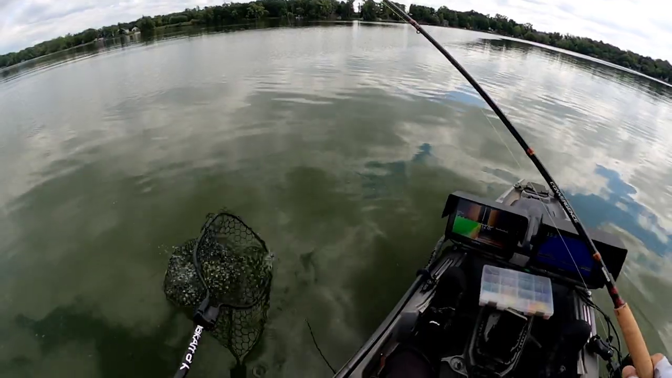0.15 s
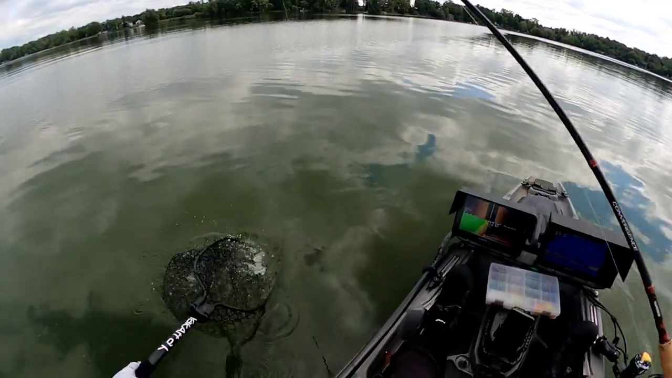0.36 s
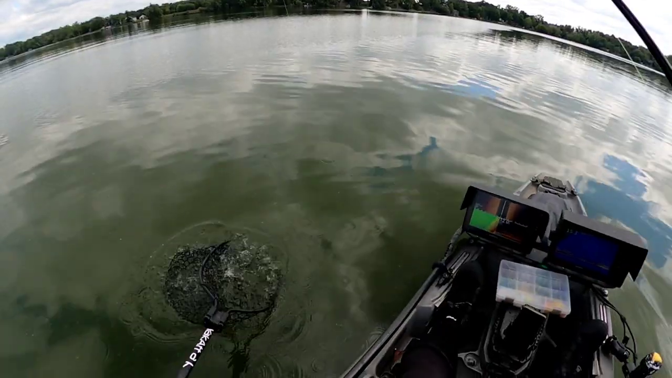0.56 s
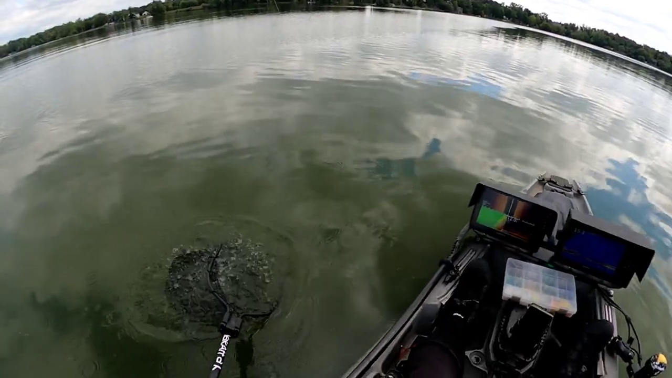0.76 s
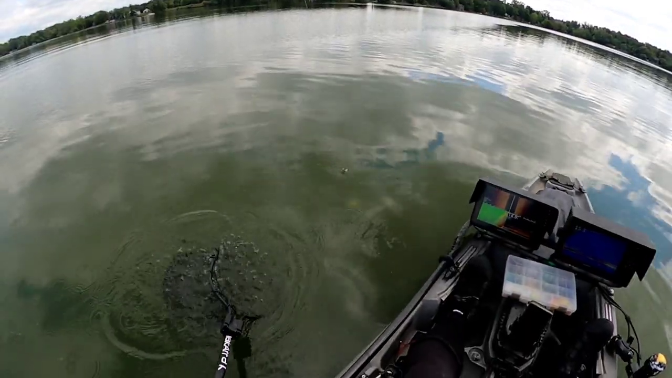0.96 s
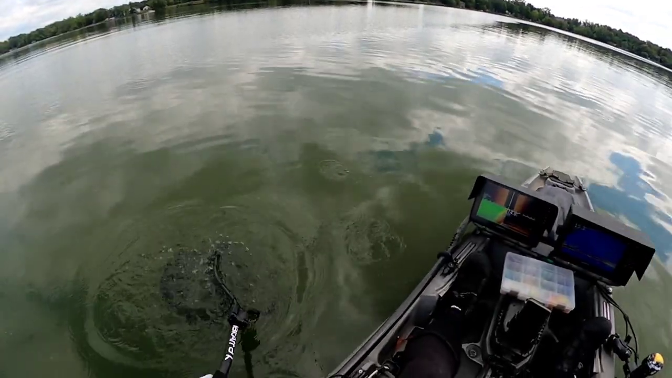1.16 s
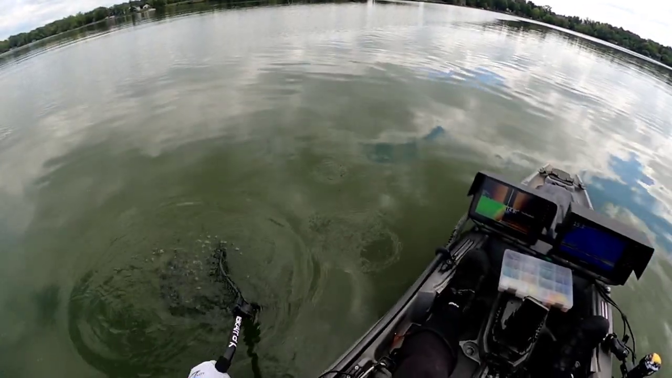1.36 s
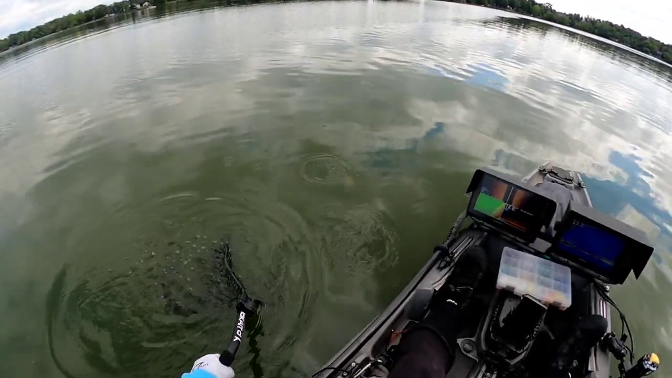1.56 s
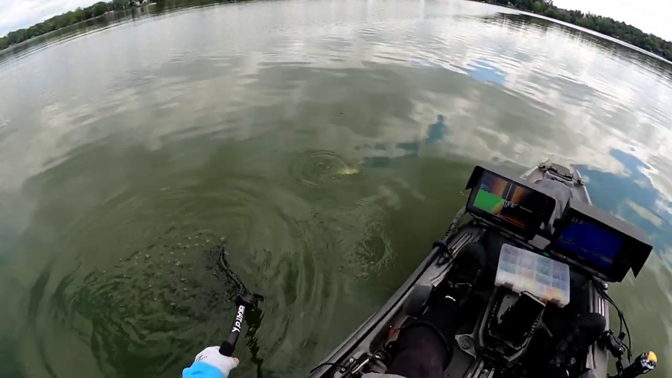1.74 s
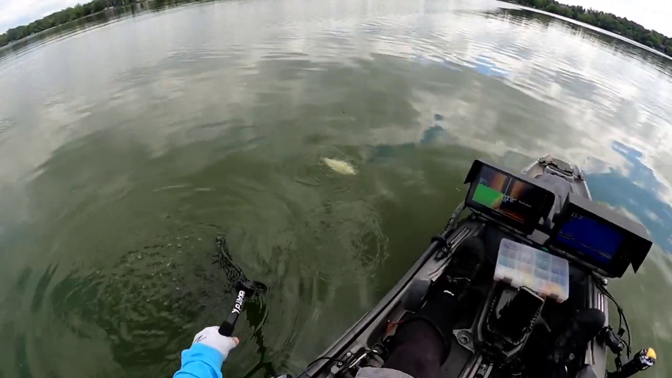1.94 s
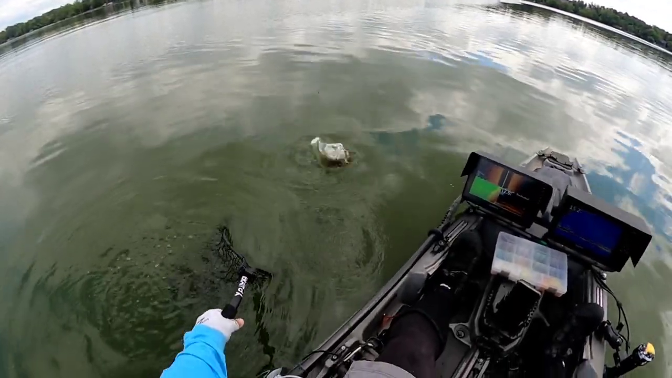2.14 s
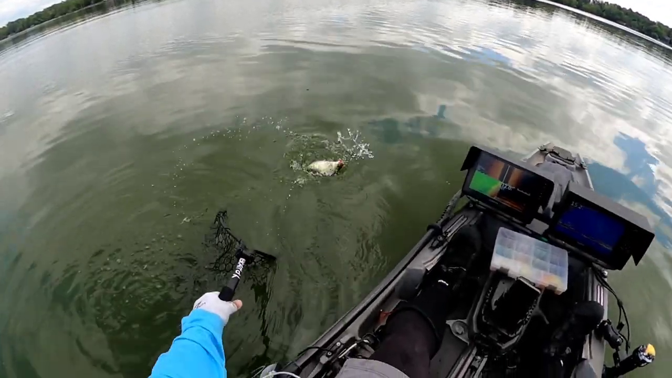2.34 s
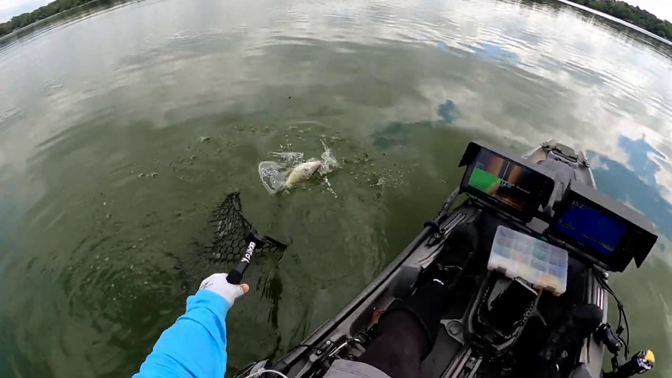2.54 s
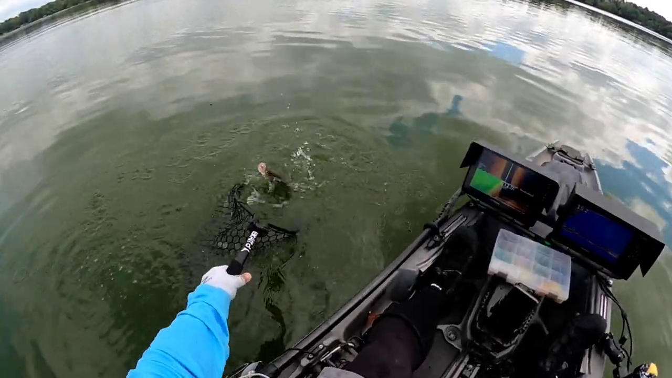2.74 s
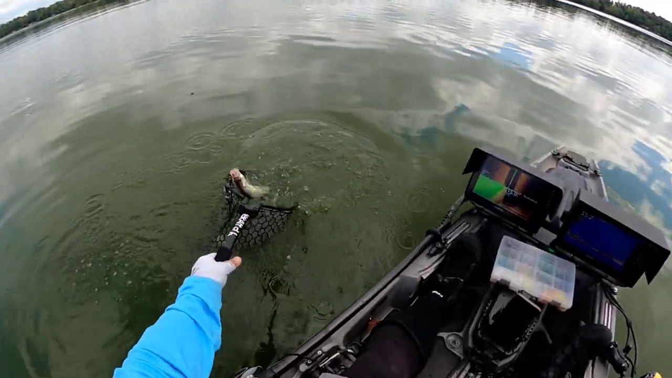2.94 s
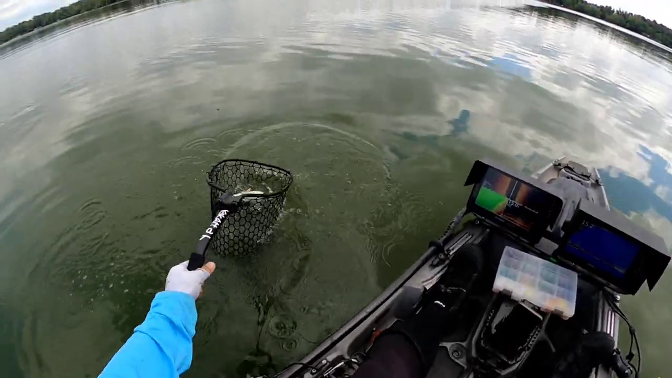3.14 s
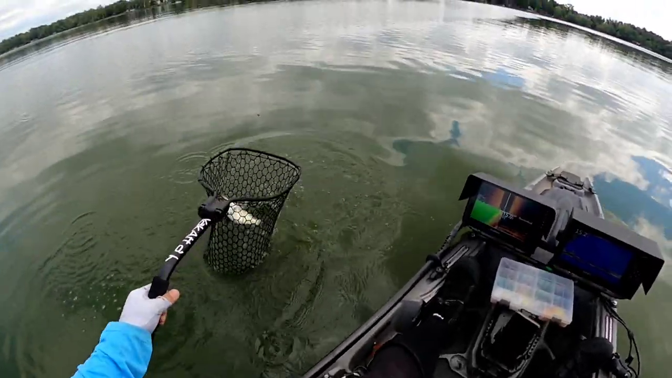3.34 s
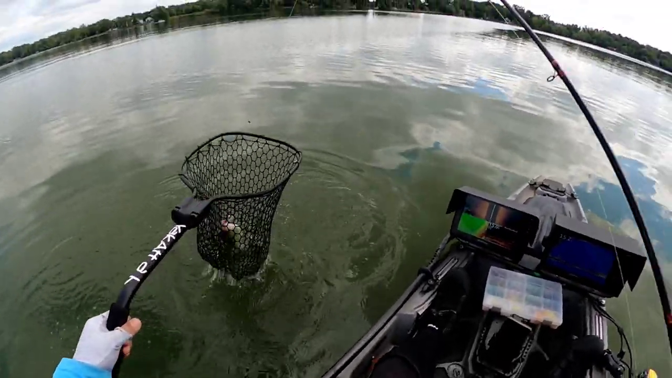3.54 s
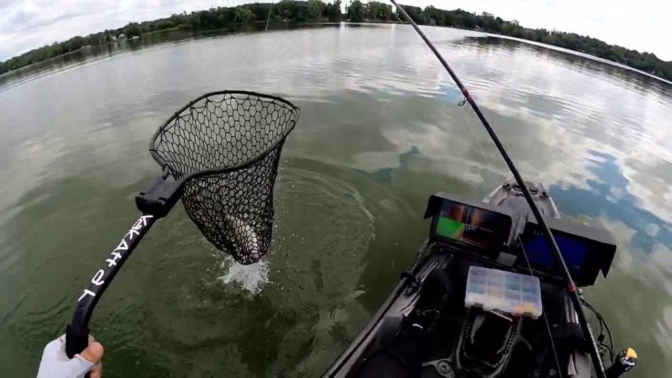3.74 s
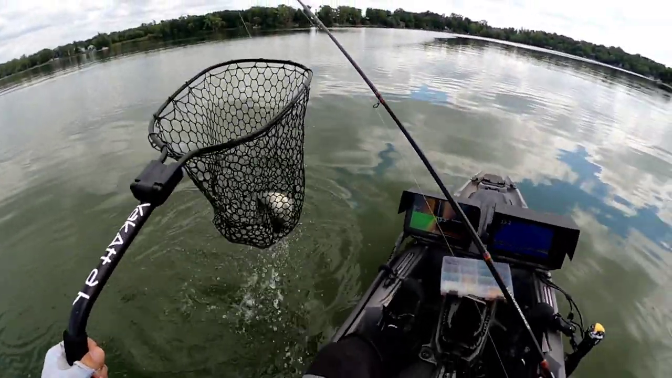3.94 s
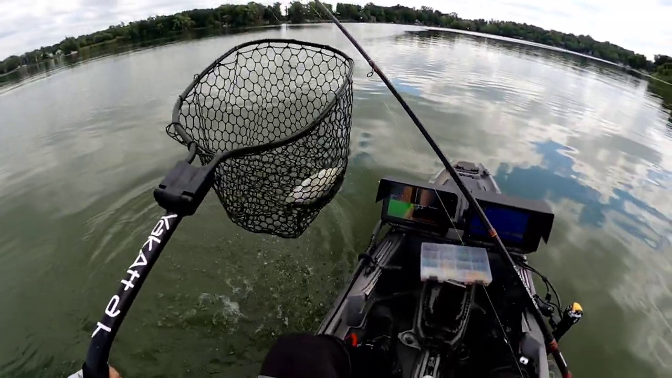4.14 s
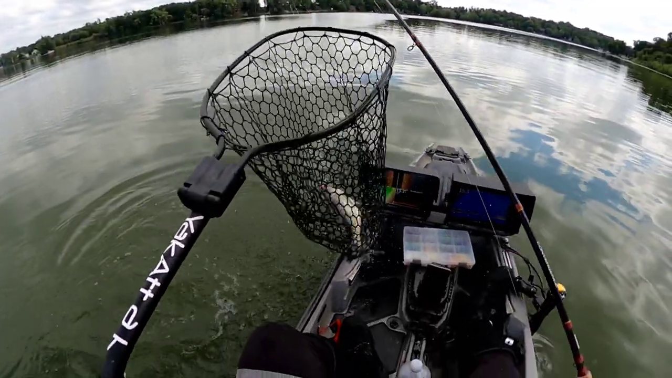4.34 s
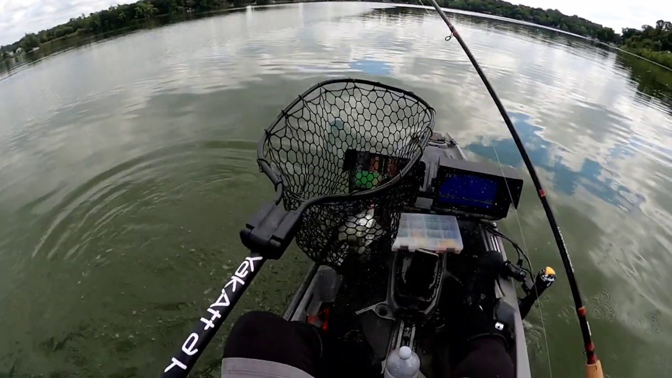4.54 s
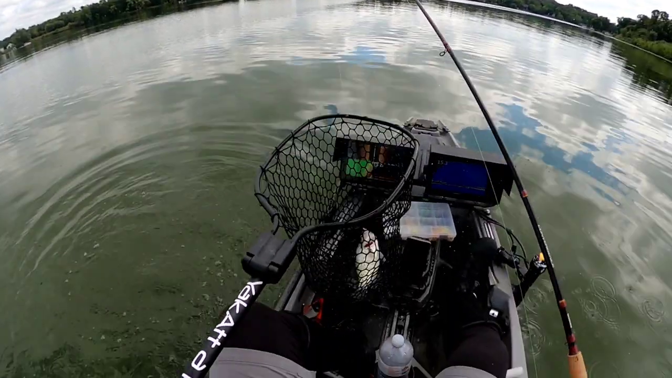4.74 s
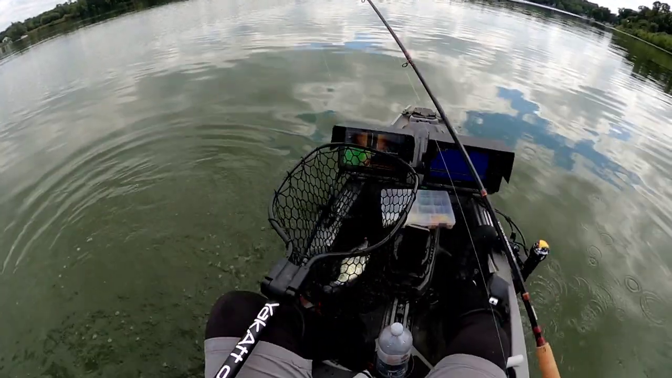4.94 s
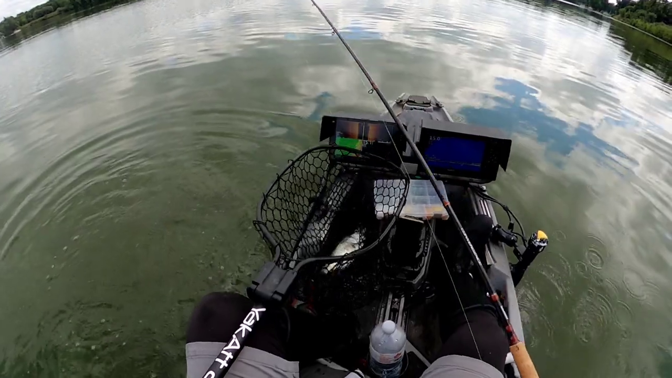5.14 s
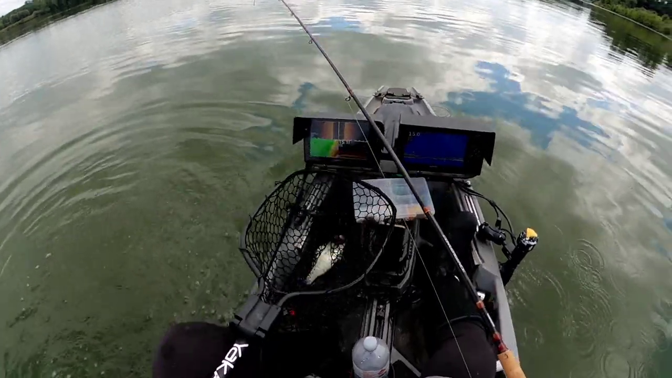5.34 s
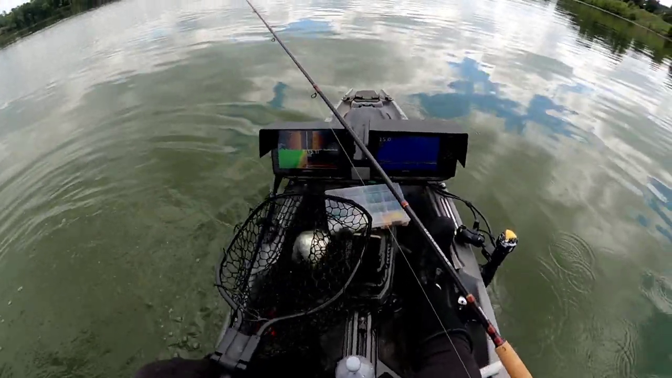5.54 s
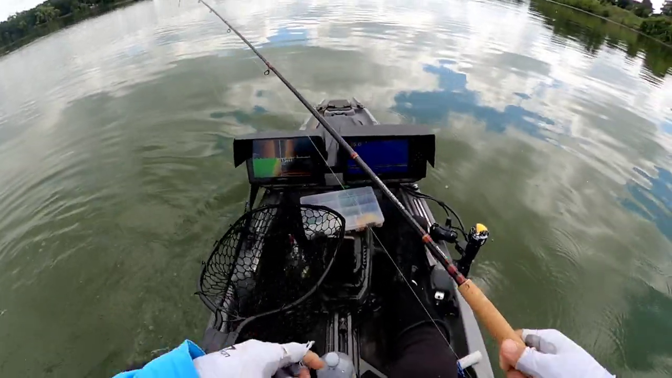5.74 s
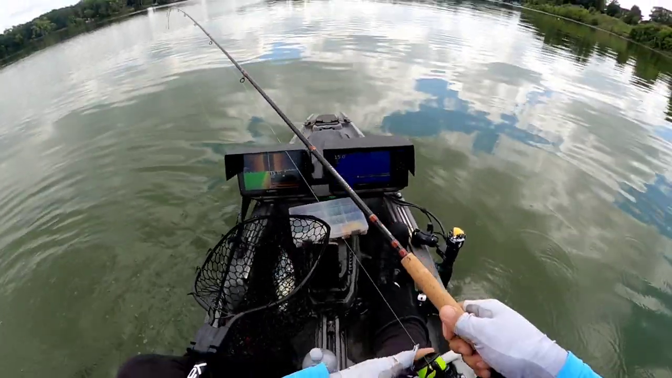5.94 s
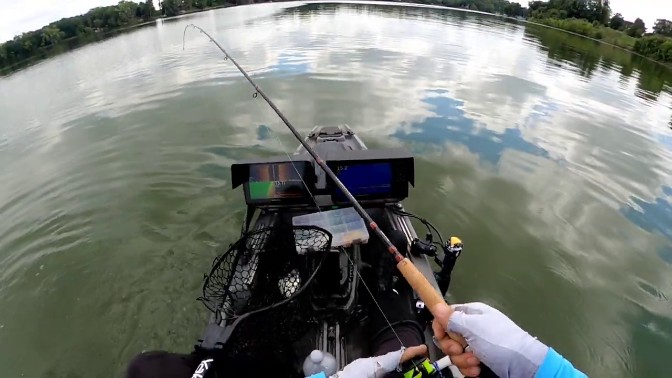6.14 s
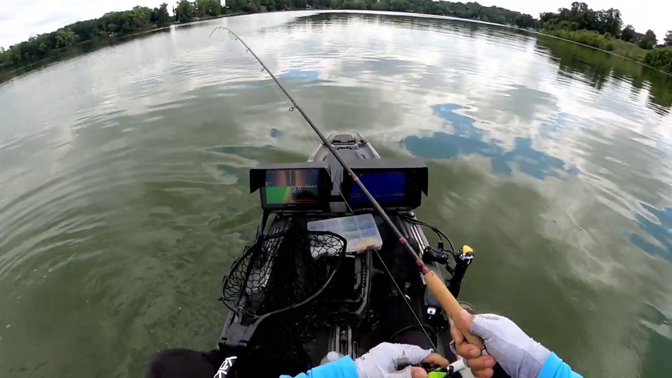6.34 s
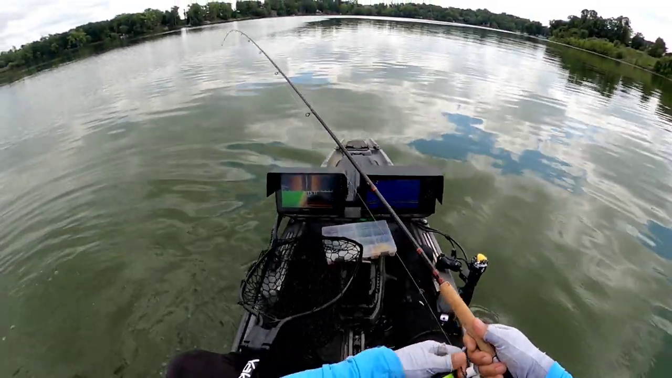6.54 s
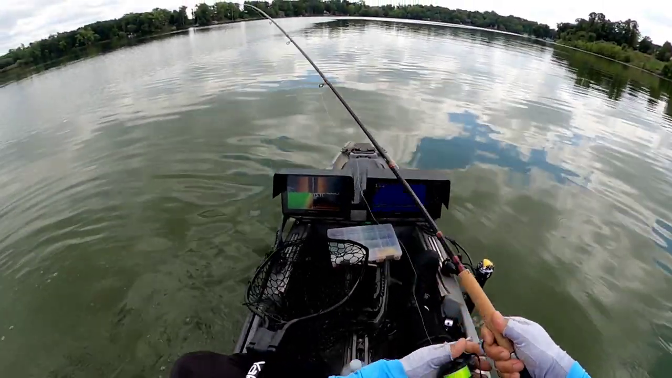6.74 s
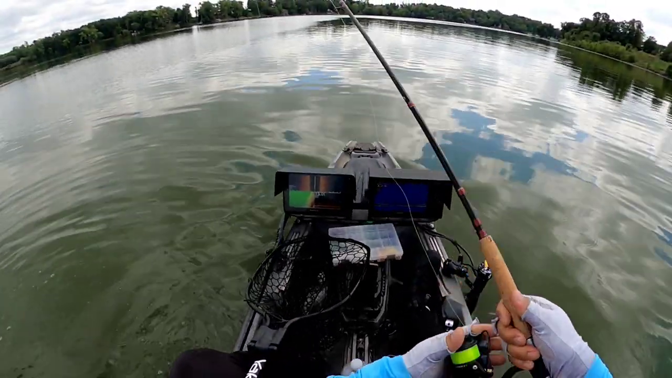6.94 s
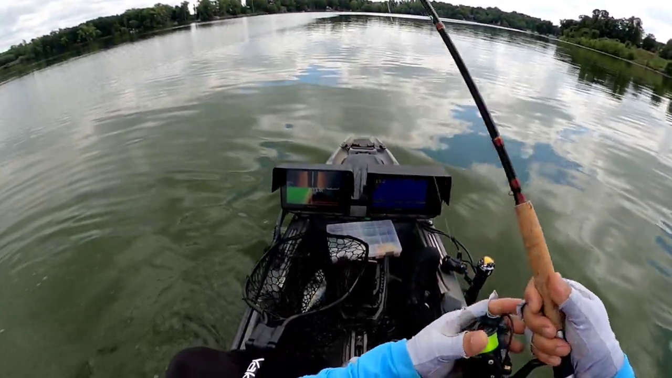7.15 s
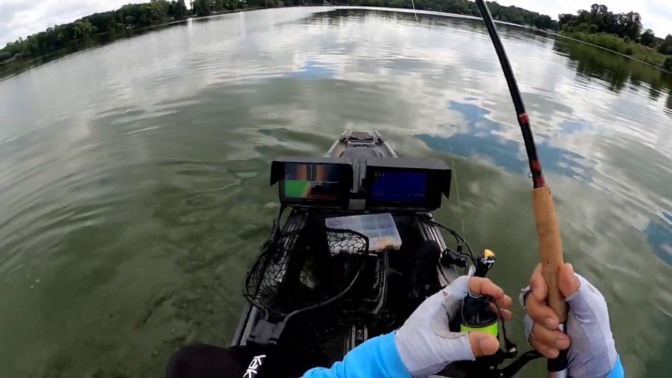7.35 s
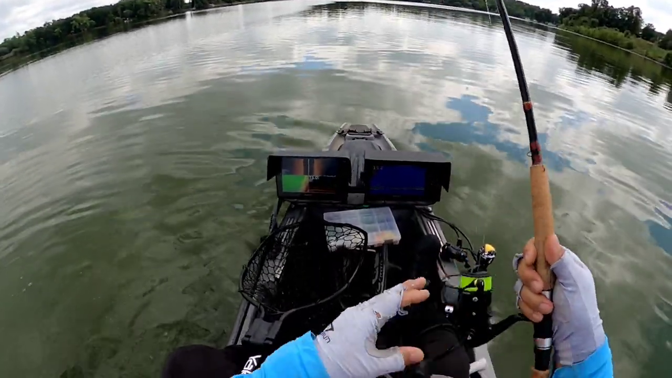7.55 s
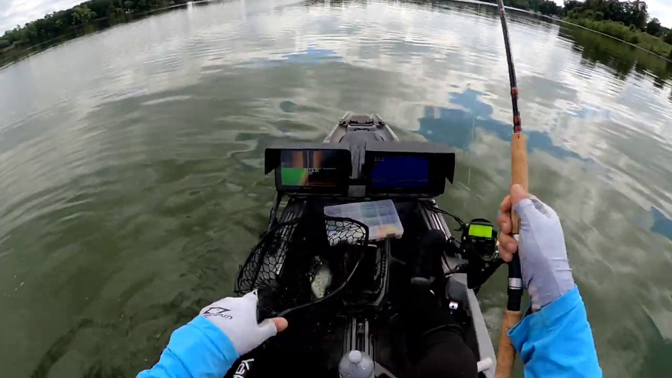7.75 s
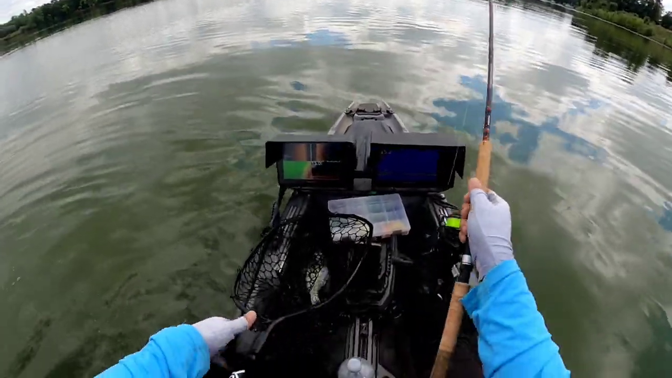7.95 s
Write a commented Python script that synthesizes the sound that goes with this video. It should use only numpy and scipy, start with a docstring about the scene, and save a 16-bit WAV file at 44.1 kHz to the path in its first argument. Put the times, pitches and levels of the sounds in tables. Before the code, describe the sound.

Close splashes and bubbly gulps, a streaming net rising from the lake, then hard frame clacks, dull hull thumps and small fishing reel clicks.

```python
"""Landing a fish from a kayak

A net dips into a calm lake; a hooked fish thrashes, is scooped up and lifted, streaming water (bubbles and sprayed noise).
The net's frame clacks on the deck and the fish flops on the hollow plastic hull (struck notes that die away).
A reel clicks and squeaks, and wet mesh drags (noise bursts and tiny grains).
All is close to a microphone in the open air, over a murmur of water (noise and bubbles), wind, a faint hum and a far bird."""
import sys
import numpy as np
from scipy import signal
from scipy.fft import rfft, irfft, next_fast_len
from scipy.io import wavfile
from scipy.ndimage import map_coordinates

SR = 44100
rng = np.random.default_rng(int(sys.argv[2]) if len(sys.argv) > 2 else 0)


def unload_audio(sound):
    """Save the sound as a 16-bit wav file, at the path given as the first command line argument."""
    columns = np.transpose(np.atleast_2d(sound))
    # keep every value between -1 and 1, then stretch to whole-number steps
    steps = np.round(np.clip(columns, -1, 1) * 32767)
    wavfile.write(sys.argv[1], SR, steps.astype(np.int16))


N = 356769  # length of the scene in samples
AGE = np.arange(SR // 3) / SR  # time since a blow, in seconds
CLOCK = np.arange(0, N, 32) / SR  # coarse scene time for slow swells, in seconds
SWELL_CYCLES = 1.2  # cycles in which a bubble's note swells

# Soft blows on the hull. Each row: start in seconds, level in dB, pitch in Hz,
# time for the struck panel to fall 60 dB in seconds.
HULL_BLOWS = [(3.507, -26.5, 219, 0.094), (4.454, -25, 142, 0.2), (4.547, -20, 112, 0.033),
              (4.573, -23.5, 128, 0.058), (4.624, -30, 215, 0.096), (4.777, -30, 256, 0.04),
              (4.956, -28.5, 402, 0.079), (5.036, -20, 59.7, 0.13), (5.062, -16.5, 526, 0.018),
              (5.07, -21, 129, 0.081), (5.135, -15.5, 111, 0.052), (5.156, -21.5, 155, 0.096),
              (5.519, -22, 115, 0.15), (5.578, -20, 182, 0.093), (5.583, -15.5, 360, 0.081),
              (5.611, -14.5, 540, 0.042), (5.626, -13.5, 380, 0.082), (5.661, -26, 78, 0.11),
              (5.841, -10.5, 145, 0.1), (5.852, -18.5, 297, 0.036), (5.887, -21, 115, 0.072),
              (5.916, -26, 153, 0.072), (6.303, -17, 124, 0.11), (6.332, -22.5, 93.5, 0.072),
              (6.632, -21, 105, 0.22), (6.665, -20, 92, 0.14), (6.826, -24, 209.5, 0.31),
              (6.898, -23, 251, 0.031), (6.965, -27.5, 64, 0.064), (7.433, -17.5, 267, 0.13),
              (7.451, -21, 355, 0.12), (7.507, -21, 176, 0.037), (7.53, -21.5, 221, 0.075),
              (7.671, -20.5, 101.3, 0.14)]
# The quiet air around the boat. Each row: time in seconds, then the levels of wind, ripples and hiss in dB.
CALM_AIR = [(0, -48.5, -53.5, -71.5), (.7, -54, -75.5, -69), (1.3, -52.5, -63, -72.5),
            (1.8, -52, -52.5, -79.5), (2.3, -52.5, -54, -71.5), (3.3, -58, -65, -67.5),
            (5.3, -51.5, -51, -67), (7.0, -58, -58.5, -65), (8.09, -51.5, -62, -76.5)]


def amp(db):
    """Decibels to gain."""
    return 10 ** (np.asarray(db) / 20)


def unit(x):
    """Scale to an average strength (rms) of 1."""
    return x / np.sqrt(np.mean(x ** 2) + 1e-20)


def peaked(x):
    """Scale to a peak of 1."""
    return x / (np.abs(x).max() + 1e-20)


def along(points, hz):
    """Read a curve of (Hz, value) points, with pitch on a log axis."""
    f, v = np.transpose(points)
    return np.interp(np.log(hz + 1), np.log(f + 1), v)


def curves(rows):
    """Gains per sample from rows of (seconds, dB, ..), silent outside their span."""
    s, *columns = np.transpose(rows)
    time = np.arange(N) / SR
    return [amp(np.interp(time, s, column, left=-120, right=-120)) for column in columns]


def wobble(rate, size=N):
    """A smooth random curve through so many random points a second."""
    knots = rng.standard_normal(int(size * rate / SR) + 4)
    return map_coordinates(knots, [np.arange(size) * rate / SR])


def filtered(x, response):
    """Multiply the spectrum of x by a response of frequency."""
    n = x.shape[-1]
    m = next_fast_len(n + SR // 8)
    return irfft(rfft(x, m) * response(np.fft.rfftfreq(m, 1 / SR)), m)[..., :n]


def colour(x, points):
    """Shape the tone of x with (Hz, dB) points, at rms 1."""
    return unit(filtered(x, lambda hz: amp(along(points, hz))))


def band(x, centre_hz, q):
    """Pass x through one broad resonance, at rms 1; a higher q is narrower."""
    return unit(filtered(x, lambda hz: 1 / (1 + (q * (hz / centre_hz - centre_hz / (hz + 1))) ** 2)))


def white(size=len(AGE)):
    """White noise, by default as long as one blow."""
    return rng.standard_normal(size)


def fade(t60, attack):
    """The envelope of a blow: a quick rise, then a decay of 60 dB in t60 seconds."""
    decay = np.exp(-np.log(1000) * AGE / max(t60, 1e-3))
    return decay * (1 - np.exp(-AGE / attack))


def add(track, s, sound):
    """Mix a sound into the track at time s."""
    part = track[max(round(s * SR), 0):][:len(sound)]
    part += sound[:len(part)]


def swell(s, hold, rise, fall):
    """Rise until time s, hold, then die; rise and fall are the seconds taken by 20 dB."""
    before = np.maximum(s - CLOCK, 0) / max(rise, 1e-3)
    after = np.maximum(CLOCK - s - hold, 0) / max(fall, 1e-3)
    return amp(-20 * (before + after))


def together(envelopes):
    """The gain per sample of several swells, summed in power."""
    return np.interp(np.arange(N) / SR, CLOCK, np.linalg.norm(envelopes, axis=0))


def bubbles(rate, low_hz, high_hz, cycles, rise, spread_db, swell_cycles=SWELL_CYCLES):
    """A cloud of bubbles at rms 1, mostly faint: each swells, rings for some cycles and may rise in pitch."""
    when, pitch, life, bulk = rng.random((int(rate * N / SR), 4)).T[:, :, None]
    hz = low_hz * (high_hz / low_hz) ** pitch
    t60 = cycles * (.25 + life) / hz
    t = np.arange(int(cycles / low_hz * SR)) / SR
    envelope = np.exp(-np.log(1000) * t / t60) * (1 - np.exp(-t * hz / swell_cycles))
    ring = envelope * np.sin(2 * np.pi * hz * t * (1 + rise * t / t60 / 2))
    sizes = amp(spread_db * bulk ** 5)
    places = (when * N).astype(int) + np.arange(len(t))
    return unit(np.bincount(places.ravel(), (sizes * ring).ravel(), N)[:N])


def ticks(rate, low_hz, high_hz, spread_db):
    """Tiny contacts of a few cycles, each at its own steady pitch, at rms 1."""
    return bubbles(rate, low_hz, high_hz, cycles=9, rise=0, spread_db=spread_db, swell_cycles=.5)


def grains(rate, spread_db):
    """Tiny impacts of uneven size at random moments, at rms 1."""
    when, bulk, side = rng.random((int(rate * N / SR), 3)).T
    sizes = np.sign(side - .5) * amp(spread_db * bulk ** 4)
    return unit(np.bincount((when * N).astype(int), sizes, N))


def ringing(modes, stretch, detune):
    """Ring modes of (Hz, dB, t60) with strengths and pitches varied for each blow; rms 1 at its start."""
    ring = 0
    for hz, level, life in modes:
        phase = 2 * np.pi * (hz * rng.normal(1, detune) * AGE + rng.random())
        ring = ring + amp(level + rng.normal(0, 4.5)) * np.sin(phase) * fade(life * stretch, 0.00019)
    return ring / np.std(ring[:SR // 200])


def stirring():
    """Gains of churn, fizz and spray: each splash crests and dies over a steady shower from fish and net."""
    # Net or fish breaks the surface. Each row: time of the crest in seconds, strength in dB,
    # deep churn and spray in dB relative to it, seconds to die by 20 dB (tiny or negative: almost at once).
    crests = [(0.286, -31.5, -6, -2.5, 0.0572), (0.354, -37, 4.5, 0, 0.0659),
              (0.415, -38, 7.5, -3.5, 0.0529), (.5, -47, -6, -18, -0.05), (.57, -56.5, -15, -1, 0.28),
              (.615, -61, -20, 1, 0.31), (1.71, -72, 17, -23, 0.1), (2.219, -43, -4, -15, -0.01),
              (2.348, -39, -2, -7.5, 0.126), (2.415, -49, 2, -12, 0.0654), (2.459, -39, -2.5, -2, 0.127),
              (2.538, -37.5, -0.5, -2.5, 0.0969), (2.58, -44.5, 1, -13, 0), (2.629, -37, -1, -3.5, 0.0877),
              (2.68, -40, -3, -5.5, .24), (2.799, -46.5, 10, -15, -0.24), (2.865, -45, -9.5, -3.5, 0.12),
              (3.185, -36.5, -9.5, 6, 0.0163), (3.29, -41.5, -18, 10, -0.5227), (3.766, -32, -6, -10, 0.07),
              (3.82, -47.5, 0, 4, 0.14), (3.931, -44, -24.5, 12.5, -0.0048), (3.975, -41, -10, 0, 0.03),
              (4.089, -38.5, -2, 1.5, 0.0936), (4.155, -48.5, -4, 3, -0.07), (4.22, -46, 1.5, 2, 0.25),
              (4.283, -45, -12, 8, -0.12)]
    rise_share = 0.91  # a splash builds in this share of the time it takes to die
    # drops rain from the fish and the wet net until it swings in over the boat
    shower = amp(-51.5) * swell(2.317, hold=1.84, rise=0.1, fall=0.16)
    # the rising fish churns under the surface
    swirl = amp(-45.5) * swell(2.124, hold=0.059, rise=0.18, fall=0.043)
    # falling drops stir little water and are mostly spray
    churn, fizz, spray = [swirl, amp(-14) * shower], [shower], [amp(-2.5) * shower]
    for s, db, churn_db, spray_db, length in crests:
        crest = amp(db) * swell(s, 0, rise_share * length, length)
        churn.append(amp(churn_db) * crest)
        fizz.append(crest)
        spray.append(amp(spray_db) * crest)
    return together(churn), together(fizz), together(spray)


def splashing():
    """Stirred water: large and small bubbles, rising drips and a crackling patter of drops, with wash and froth."""
    # The tone of the patter. Each row: pitch in Hz, level in dB.
    spray_tone = [(900, -29), (1600, -2), (3000, -8), (4500, -3.5), (6660, -2), (8310, -7), (9890, -7),
                  (13000, -5.5), (15400, -33)]
    churn, fizz, spray = stirring()
    clumps = unit(amp(2.1 * wobble(90)))  # water falls in dollops, so fizz and spray come in bursts
    large = bubbles(rate=280, low_hz=380, high_hz=1150, cycles=26, rise=.25, spread_db=6)
    small = bubbles(rate=330, low_hz=1100, high_hz=3600, cycles=48, rise=.4, spread_db=11)
    droplets = bubbles(rate=550, low_hz=3000, high_hz=7000, cycles=48, rise=.3, spread_db=11)
    drips = bubbles(rate=75, low_hz=1200, high_hz=3400, cycles=100, rise=.65, spread_db=4)
    wash = band(white(N), 540, q=0.73)
    froth = band(ticks(rate=1600, low_hz=700, high_hz=6000, spread_db=18), 2100, q=0.45)
    drops = ticks(rate=1300, low_hz=2000, high_hz=13000, spread_db=16)
    patter = colour(.5 * grains(420, 15) + drops, spray_tone)
    body = large + amp(-7) * wash
    trickle = small + amp(-1) * drips + amp(-2) * froth
    shower = amp(-3) * droplets + amp(-0.5) * patter
    return amp(-3.0) * churn * body + clumps * (amp(-4.0) * fizz * trickle + spray * shower)


def gulps():
    """Trapped air rings as single rising notes: short gulps die fast, longer plinks ring on and climb further."""
    # Bubbles trapped by fish, net and drops. Each row: start in seconds, level in dB,
    # starting pitch in Hz, time to fall 60 dB in seconds.
    notes = [(.250, -34, 652, 0.071), (0.28, -30, 1540, 0.025), (0.289, -31, 398, 0.12),
             (0.344, -28, 1670, 0.02), (.352, -26.5, 513, 0.037), (0.393, -30, 360, 0.039),
             (0.413, -26.5, 904, 0.032), (0.428, -25.5, 390, 0.04), (0.494, -42, 1840, .02),
             (.533, -39, 1400, .018), (.598, -39.5, 1820, 0.033), (.614, -36, 1410, .014),
             (1.051, -43.5, 624, 0.12), (1.342, -55, 1560, 0.087), (1.70, -50, 643, 0.14),
             (2.209, -37, 1350, 0.073), (2.245, -19.5, 672, 0.032), (2.283, -33.5, 1530, 0.03),
             (2.33, -32, 1140, 0.042), (2.378, -24, 476, 0.033), (2.389, -34, 1580, 0.03),
             (2.415, -33, 586, 0.07), (2.441, -31, 1280, 0.025), (2.455, -21.5, 1710, 0.02),
             (2.464, -30, 1280, 0.025), (2.463, -27.5, 440, 0.03), (2.487, -42, 600, 0.054),
             (2.531, -18, 1600, 0.0094), (2.534, -26, 655, 0.042), (2.546, -31, 580, 0.031),
             (2.559, -39, 2180, 0.02), (2.601, -35, 1080, 0.04), (2.611, -31.5, 673, 0.035),
             (2.631, -16.5, 1280, 0.0095), (2.634, -22.5, 346, 0.024), (2.647, -29.5, 395, 0.042),
             (2.66, -34, 2700, 0.018), (2.773, -32, 733, 0.047), (2.805, -39, 573, 0.082),
             (2.846, -29, 1480, 0.042), (2.942, -38, 2900, 0.058), (3.01, -47, 1170, 0.032),
             (3.048, -44, 2320, 0.023), (3.061, -40.5, 1520, 0.055), (3.073, -41, 2180, 0.035),
             (3.079, -40, 1240, .03), (3.097, -41.5, 1110, 0.045), (3.11, -34.5, 2010, 0.048),
             (3.124, -41, 1330, 0.045), (3.133, -43, 2180, 0.033), (3.189, -34, 1100, 0.032),
             (3.246, -39, 1700, 0.03), (3.292, -39, 1810, 0.033), (3.385, -46, 1760, 0.037),
             (3.459, -41, 3570, 0.023), (3.475, -47, 3430, 0.018), (3.683, -35.5, 1270, 0.035),
             (3.738, -29, 1330, 0.019), (3.746, -31, 1900, 0.02), (3.751, -33, 1090, 0.024),
             (3.760, -27, 720, 0.02), (3.772, -29, 1820, 0.025), (3.8, -41, 1830, 0.03),
             (3.809, -39, 1090, .025), (3.926, -39, 2380, 0.027), (3.975, -35, 920, 0.034),
             (4.056, -41, 1410, 0.02), (4.12, -45, 3100, 0.02), (4.228, -40, 3500, .02),
             (4.281, -33, 2670, 0.028), (4.35, -43, 1890, 0.031)]
    rise_per_cycle = 0.0084  # sets how far the pitch climbs with each cycle
    out = np.zeros(N)
    for s, db, hz, t60 in notes:
        climb = rise_per_cycle * hz * np.minimum(AGE, 2 * t60) / 2
        phase = 2 * np.pi * hz * AGE * (1 + climb)
        envelope = fade(t60, 0.00081) * (1 - np.exp(-(AGE * hz / SWELL_CYCLES) ** 2))
        add(out, s, amp(db) * peaked(envelope) * np.sin(phase))
    return out


def slaps():
    """Fin and drops hit the surface: a sharp snap with a bright spit of spray, and a tiny trapped bubble rings."""
    # Slaps of fin and falling drops. Each row: start in seconds, level in dB,
    # centre of the snap and starting pitch of the bubble in Hz.
    hits = [(0.287, -21.5, 2050), (0.427, -23.5, 1680), (.558, -37, 3100), (0.57, -38, 2610),
            (1.0504, -33, 2030), (2.327, -25, 1670), (2.3476, -13.5, 5830), (2.458, -24, 2280),
            (2.5272, -20, 1770), (2.6284, -16.5, 3960), (2.631, -12, 3160), (2.7069, -20.5, 2120),
            (2.801, -11, 2270), (2.846, -27.5, 2330), (2.8708, -30, 2070), (2.9833, -20, 2640),
            (3.016, -27, 3570), (3.0647, -35, 3580), (3.081, -34, 3600), (3.168, -30, 1400),
            (3.1788, -28, 1590), (3.192, -20, 2100), (3.236, -29, 2580), (3.3848, -32, 2170),
            (3.503, -30, 1700), (3.616, -25.5, 2120), (3.748, -33, 1310), (3.7726, -23, 2080),
            (3.9252, -28, 2580), (3.991, -33, 2270), (4.0281, -33, 1770), (4.0564, -31, 2010),
            (4.071, -34, 3000), (4.096, -35.5, 2600), (4.2176, -29, 2020), (4.321, -33, 5000),
            (4.3413, -30.5, 2330)]
    slap_t60, ping_t60 = 0.015, 0.0085  # seconds
    out = np.zeros(N)
    for s, db, hz in hits:
        snap = peaked(band(white(), hz, q=1.34) * fade(slap_t60, 0.00013))
        spit = peaked(band(white(), 5870, q=2.7) * fade(slap_t60, 0.00037))
        ping = np.sin(2 * np.pi * hz * AGE * (1 + 6 * AGE)) * fade(ping_t60, 0.00038)
        add(out, s, amp(db + 0.5) * (snap + amp(-12.5) * spit + amp(-2.0) * ping))
    return out


def clacks():
    """The frame rings, bounces and chatters; a hard contact adds a crack, a heavy one a knock from the deck."""
    # The net's frame against deck and gear. Each row: start in seconds, level in dB,
    # treble in dB, knock in dB, base ring time in seconds.
    contacts = [(4.459, -24.5, -3.5, -11.5, 0.048), (4.5041, -25.5, -2.5, -8.5, 0.041),
                (4.5498, -26, -2, 3.5, 0.069), (4.6258, -23, 1.5, -4.5, 0.055),
                (4.656, -24, -24, -7, 0.049), (4.692, -17, -13, -20, 0.12), (4.7202, -24, -2, -13, 0.08),
                (4.7334, -19.5, -4, -13.5, 0.056), (4.8236, -28.5, -7, -6.5, 0.087),
                (4.87, -10, -3.5, -30, 0.067), (4.887, -18.5, -9, -21, 0.077),
                (4.912, -9, -0.5, -13.5, 0.03), (4.951, -23.5, 4, -4.5, 0.046),
                (5.017, -9.5, -0.5, -33, 0.067), (5.0315, -21.5, -3, -18, 0.064),
                (5.0592, -13.5, -2, -8.5, 0.065), (5.1344, -11.5, -4, -12.5, 0.021),
                (5.146, -28, -24, -16, .08), (5.1591, -25.5, -7, -2, 0.12), (5.457, -17, -14.5, -6.5, 0.1),
                (5.5302, -24.5, -20, 4.5, 0.032), (5.5693, -18.5, -31, 0.5, 0.082),
                (5.6099, -11.5, -5, -5.5, 0.053), (5.6257, -11, -29, -7, 0.023), (5.67, -26, -7, -16, 0.15),
                (5.7126, -8.5, -4, -25, 0.061), (5.837, -16.5, -14, -12, 0.06), (5.88, -19, -3, -33, 0.024),
                (6.342, -30.5, 6, -7, 0.015), (6.3529, -27, 6, -3, 0.02), (6.805, -15, -25, -6.5, 0.084),
                (7.398, -14.5, -16, -13.5, 0.035), (7.4085, -27, 7, -9, 0.033),
                (7.4524, -14.5, -31, -5, 0.027), (7.503, -33.5, -19, 0, 0.042)]
    # The notes of the frame. Each row: pitch in Hz, level in dB, ring time in seconds before scaling.
    frame_modes = [(1307, -1, 0.057), (1560, 1.5, 0.071), (1816, 9, 0.036), (2237, 2.5, 0.05),
                   (2480, 8.5, 0.026), (2913, 9, 0.025), (3420, -1, 0.056), (3895, 4, 0.042),
                   (4500, -6, 0.023), (4950, -3, 0.034), (5230, -16, 0.033), (6200, -31, 0.016),
                   (6890, -5, 0.05), (7540, -5.5, 0.046)]
    # The tone of the crack. Each row: pitch in Hz, level in dB.
    crack_tone = [(2500, -25), (4200, 3), (6500, 0.5), (8000, -11), (11000, -14.5), (15000, -21)]
    bounce_s, bounce_db = .016, -22  # typical gap between contacts; level of the one bounce
    chatter_db, chatter_loss_db = -34.5, -9  # then it chatters, each time weaker
    brush_db, brush_per_knock = -18, 0.41
    out = np.zeros(N)
    for s, db, treble_db, knock_db, t60 in contacts:
        ring = ringing(frame_modes, np.sqrt(t60 / 0.14), detune=0.0084)
        contact_hz = 2100 * np.exp(rng.normal(0, 0.25))  # each point of contact favours its own note
        clatter = band(white(), contact_hz, q=2.0) * fade(t60 * 0.88, 0.0023)
        crack = colour(white(), crack_tone) * fade(t60 * 0.5, 0.00032)
        knock = peaked(band(white(), 418, q=0.58) * fade(0.059, 0.00047))
        metal = amp(-13) * ring + amp(-12.5) * clatter + amp(treble_db - 6.0) * crack
        blow = amp(db) * (metal + amp(knock_db) * knock)
        add(out, s, blow)
        add(out, s + bounce_s * rng.uniform(.7, 1.5), amp(bounce_db) * blow)
        for k in range(2):
            late = (k + 2) * bounce_s * rng.uniform(.8, 1.2)
            add(out, s + late, amp(db + chatter_db + k * chatter_loss_db) * ring)
        # slack mesh brushes the deck first, the more the heavier the landing
        brush = band(white(), 2700, q=0.18) * fade(0.053, 0.02)
        add(out, s - .012, amp(db + brush_db + brush_per_knock * knock_db) * brush)
    return out


def thumps():
    """Fish and net land on the hull: the panel struck gives the pitch, and nearby hull modes join in."""
    # The hull's own notes. Each row: typical pitch in Hz, typical level in dB.
    hull_modes = [(62, 1), (105, -1), (135, 4), (172, 2.5), (225, 7), (275, 3), (340, 0), (405, 6),
                  (515, -8.5), (610, -8)]
    out = np.zeros(N)
    for s, db, hz, t60 in HULL_BLOWS:
        panel = np.sin(2 * np.pi * hz * AGE) * fade(t60, 0.00086)
        shell = 0
        for mode, level in hull_modes:
            distance_db = 8.6 * abs(np.log2(mode / hz))  # modes far from the panel's pitch are weaker
            phase = 2 * np.pi * (mode * rng.normal(1, 0.0735) * AGE + rng.random())
            shell = shell + amp(level + rng.normal(0, 2.1) - distance_db) * np.sin(phase)
        blow = amp(-1.0) * panel + amp(-6) * shell * fade(t60 * 1.12, 0.0022)
        add(out, s, amp(db - 2.5) * peaked(blow))
    return out


def jolt():
    """One deep thump swings opposite ways at the two microphone ports, so it sounds wide."""
    out = np.zeros(N)
    add(out, 5.036, amp(-19) * np.cos(2 * np.pi * 61.5 * AGE) * fade(0.12, 0.0028))
    return np.array([out, -out])


def knocks():
    """The hollow handle knocks with one strong note and a few weak ones, plus a little noise."""
    # Knocks of the net's and rod's handles. Each row: start in seconds, level in dB,
    # base pitch in Hz, time to fall 60 dB in seconds.
    handle_blows = [(3.505, -40, 777, 0.043), (4.201, -28.5, 1250, 0.053), (4.274, -31, 1136, 0.017),
                    (5.457, -23.5, 1280, 0.011), (5.568, -24.5, 1160, 0.022), (6.304, -31, 399, 0.062),
                    (7.398, -21.5, 1700, 0.013)]
    # The notes of a handle. Each row: multiple of the base pitch, level in dB.
    handle_notes = [(0.411, -0.5), (0.998, 12), (1.12, -28), (1.78, -28), (2.55, -40)]
    out = np.zeros(N)
    for s, db, hz, t60 in handle_blows:
        ring = sum(amp(level) * np.sin(2 * np.pi * hz * ratio * AGE) for ratio, level in handle_notes)
        add(out, s, amp(db) * (ring + 0.5 * band(white(), 1050, q=0.36)) * fade(t60, 0.00046))
    return out


def clicks():
    """Small plastic and metal parts of the reel tick, rattle and set its body ringing briefly."""
    # Small clicks of reel and rod. Each row: start in seconds, level in dB, centre of the tick in Hz.
    click_rows = [(5.986, -31.5, 1300), (6.082, -32, 3930), (6.156, -35, 2100), (6.168, -27.5, 1750),
                  (6.488, -37, 6600), (6.515, -47, 7040), (6.563, -38, 5000), (7.0379, -19.5, 2920),
                  (7.051, -21, 4170), (7.1148, -22.5, 2360), (7.133, -26, 1970), (7.1558, -21, 4320),
                  (7.1623, -27.5, 2450), (7.2682, -28.5, 1740), (7.3593, -36.5, 2450), (7.558, -25.5, 2640),
                  (7.71, -23.5, 3680), (7.747, -37, 1890), (7.866, -35, 1810), (7.922, -24, 2140),
                  (7.979, -34, 1960), (7.996, -38, 1900), (8.047, -30.5, 1980), (8.076, -26, 2040)]
    # The notes of the reel. Each row: pitch in Hz, level in dB, free ring time in seconds.
    reel_modes = [(1400, 1, 0.04), (1800, 5, 0.058), (2345, 10, 0.022), (2820, 3, 0.018), (3560, -6, 0.033),
                  (3820, -25, .035), (6000, -9, 0.026)]
    tick_t60, damping = 0.021, 0.75  # seconds; share of the reel's free ring left in the hand
    rattle_gap_s, rattle_loss_db = 0.0089, -15  # loose parts strike again, each time weaker
    out = np.zeros(N)
    for s, db, hz in click_rows:
        for k in range(3):
            noise = band(white(), hz, q=2.17) + amp(-6.5) * band(white(), 950, q=1.0)
            tick = peaked(noise * fade(tick_t60, 0.00015))
            ring = ringing(reel_modes, damping, detune=0.0082)
            late = k * rattle_gap_s * rng.uniform(0.85, 0.97)
            add(out, s + late, amp(db + k * rattle_loss_db) * (amp(-2.5) * tick + amp(-16.0) * ring))
    return out


def squeaks(count=9):
    """The reel sticks and slips unevenly; each slip rasps briefly near the pitch, with one overtone."""
    # The reel squeaks as it is turned. Each row: start in seconds, level in dB, typical pitch in Hz.
    turns = [(6.056, -40.5, 1950), (6.146, -41.5, 1920)]
    squeak_s, slip_t60 = 0.062, 0.036  # seconds
    slip_q, scatter = 5.5, .045  # sharpness; share by which the pitch scatters
    overtone_ratio, overtone_db = 2.03, -9
    out = np.zeros(N)
    for s, db, hz in turns:
        for k in range(count):
            progress = (k + rng.random()) / count
            low = band(white(), hz * np.exp(rng.normal(0, scatter)), q=slip_q)
            high = band(white(), hz * overtone_ratio * np.exp(rng.normal(0, scatter)), q=slip_q)
            slip = (low + amp(overtone_db) * high) * fade(slip_t60, 0.00062)
            add(out, s + progress * squeak_s, amp(db) * np.sin(np.pi * progress) * slip)
    return out


def rub(hz, q, length):
    """A stroke swells and dies away as it catches and slips many times against one resonance."""
    slips = white() * amp(12 * rng.random(len(AGE)) + 3.5 * wobble(260, size=len(AGE)))
    progress = (AGE / length * 2.4) ** 2
    return amp(-1.0) * progress * np.exp(1 - progress) * band(slips, hz, q=q)


def scrapes():
    """Mesh, glove and line scrape broadly over deck and gear."""
    # Short scrapes. Each row: start in seconds, level in dB, centre in Hz,
    # length in seconds, sharpness of the resonance (q).
    strokes = [(4.476, -42, 2100, 0.04, 0.7), (4.541, -33.5, 2540, 0.065, 0.55),
               (4.611, -28.5, 2360, 0.032, 0.55), (4.902, -33, 1500, 0.035, 0.25),
               (5.488, -36, 2240, 0.12, 0.38), (5.573, -37, 2600, 0.032, 1.1),
               (5.612, -28, 1000, 0.024, 0.54), (5.825, -42, 1500, 0.03, 0.46),
               (5.862, -34, 3030, 0.039, 1), (6.274, -39.5, 2020, 0.043, 0.6),
               (6.318, -39.5, 3040, 0.056, 0.33), (6.643, -34, 1510, 0.077, 0.34),
               (6.792, -28, 1700, 0.028, 0.22), (6.809, -42, 806, 0.068, 0.43),
               (7.137, -46, 2070, 0.027, 4.1), (7.266, -41.5, 1870, 0.044, 1.05),
               (7.389, -26.5, 1830, 0.033, 0.83), (7.433, -31, 450, 0.043, 0.64),
               (7.492, -50, 1100, 0.024, 1), (7.515, -45.5, 3900, 0.045, 0.55),
               (7.678, -41.5, 3450, 0.036, 0.67)]
    out = np.zeros(N)
    for s, db, hz, length, q in strokes:
        add(out, s, amp(db) * rub(hz, q, length))
    return out


def rubbing():
    """Gains of rumble, scrape and rustle: strokes over a faint fidgeting, and a shudder after each hull blow."""
    # Wet mesh and sleeves drag over the deck. Each row: start in seconds, length in seconds,
    # then the levels of rumble, scrape and rustle in dB.
    drag_rows = [(4.477, 0.34, -46.5, -44.5, -54.5), (4.912, 0.076, -43, -41.5, -57),
                 (5.042, 0.14, -53, -55.5, -77), (5.495, .19, -33.5, -43.5, -68),
                 (5.75, 0.23, -56, -52.5, -73), (6.292, 0.021, -40, -45, -51), (6.467, 0.13, -54, -56, -62),
                 (6.623, 0.16, -47, -50, -63), (6.816, 0.094, -39, -52.5, -58.5),
                 (7.028, 0.13, -43.5, -77, -86), (7.408, 0.12, -37, -49, -67),
                 (7.661, 0.039, -41.5, -53.5, -66)]
    rise_s, fade_s = 0.052, 0.082  # time to swell and to die by 20 dB
    shudder_db, shudder_rise_s, shudder_fade_s = -25.5, 0.0047, 0.13  # hull and gear rumble on
    fidget = swell(4, N / SR, rise_s, fade_s)  # once the net is aboard it never lies quite still
    rumble, scrape, rustle = [amp(-52.5) * fidget], [amp(-60.5) * fidget], [amp(-74) * fidget]
    for s, length, rumble_db, scrape_db, rustle_db in drag_rows:
        stroke = swell(s, length, rise_s, fade_s)
        rumble.append(amp(rumble_db) * stroke)
        scrape.append(amp(scrape_db) * stroke)
        rustle.append(amp(rustle_db) * stroke)
    for s, db, _, _ in HULL_BLOWS:
        shudder = swell(s + shudder_rise_s, 0, shudder_rise_s, shudder_fade_s)
        rumble.append(amp(db + shudder_db) * shudder)
    return together(rumble), together(scrape), together(rustle)


def dragging():
    """Mesh and cloth catch and slip in tiny grains, which also drum on the deck."""
    # The tones of the drumming deck and of the rustling mesh. Each row: pitch in Hz, level in dB.
    deck_tone = [(15, -26), (30, 4.5), (70, -1), (120, 1), (220, 0), (380, -4.5), (520, -10.5),
                 (800, -19.5), (1200, -18.5), (2000, -38), (4000, -67)]
    mesh_tone = [(1760, -42), (3000, -18.5), (7450, -5.5), (8310, -15), (9520, -9.5), (13200, -6),
                 (14500, -24), (15400, -40)]
    rumble, scrape, rustle = rubbing()
    slips = amp(6.1 * wobble(60))
    low = amp(-0.5) * rumble * colour(grains(900, 8.2), deck_tone)
    middle = amp(-3.5) * scrape * band(grains(2500, 5.9), 1060, q=0.4)
    catches = ticks(rate=1500, low_hz=2400, high_hz=12500, spread_db=15)
    return low + slips * (middle + rustle * colour(catches, mesh_tone))


def lake():
    """Ripples murmur, lap and fizz around the hull, and a faint hum wavers."""
    # The tones of the murmur and of the fizz. Each row: pitch in Hz, level in dB.
    lake_tone = [(20, -3.5), (60, -4), (110, -4.5), (190, 0), (260, -5.5), (440, -14.5), (800, -19),
                 (1500, -24), (2200, -33.5), (3500, -55), (9000, -65)]
    hiss_tone = [(1500, -29), (2500, 4.5), (4000, -1.5), (5000, 2), (7500, 2), (9500, -4), (12000, -3.5),
                 (15000, -19)]
    # The faint low hum. Each row: time in seconds, level in dB before it wavers.
    hum_level = [(0, -71.5), (6.3, -79), (7.8, -49.5), (8.09, -46.5)]
    _, ripple, hiss = curves(CALM_AIR)
    murmur = amp(-52 + wobble(21)) * colour(white(N), lake_tone)
    lapping = bubbles(rate=600, low_hz=500, high_hz=1700, cycles=12, rise=.2, spread_db=4)
    laps = amp(-9.0 + 1.7 * wobble(11)) * ripple * lapping
    pops = ticks(rate=130, low_hz=3100, high_hz=11000, spread_db=19)
    fizz = hiss * (colour(white(N), hiss_tone) + 0.5 * colour(pops, hiss_tone))
    phase = 2 * np.pi * np.cumsum(165 + 3 * wobble(11)) / SR
    hum = curves(hum_level)[0] * amp(1.4 * wobble(30)) * np.sin(phase)
    return murmur + laps + fizz + hum


def breeze():
    """Light wind rumbles at the microphone; the deepest part differs from port to port."""
    # The tone of the wind. Each row: pitch in Hz, level in dB.
    wind_tone = [(12, -35), (22, 2), (55, -14), (88, 9.5), (125, -2.5), (200, -10.5), (500, -49),
                 (2000, -93)]
    buffet = band(white((2, N)), 38, q=.8) * amp(2 * wobble(6))
    gusts = curves(CALM_AIR)[0] * amp(-1.0 + wobble(32))
    return gusts * (colour(white(N), wind_tone) + 0.37 * buffet)


def bird():
    """A far bird twitters: each run is three thin notes that rise and fall."""
    # Runs of notes. Each row: start of the first note in seconds, peak level in dB.
    runs = [(1.38, -72), (1.797, -74)]
    top_hz, arch_hz = 4830, 350  # top of the arch and its height
    note_s, gap_s = 0.027, 0.041  # length of a note; time from one note to the next
    out = np.zeros(N)
    arch = np.sin(np.pi * np.minimum(AGE / note_s, 1))
    note = arch * np.sin(2 * np.pi * np.cumsum(top_hz - arch_hz * (1 - arch)) / SR)
    for s, db in runs:
        for k in range(3):
            add(out, s + k * gap_s, amp(db) * note)
    return out


def surroundings(x, wet_db, t60):
    """Deck and gear scatter a weak, short answer."""
    tail = band(white(), 1830, q=0.14) * fade(t60, 0.0042)
    return x + amp(wet_db) * signal.fftconvolve(x, tail / np.linalg.norm(tail))[:N]


def place(x, left_db):
    """Two close ports: alike in the low middle; higher up, direction and scattered sound set them apart."""
    # How much the ports differ. Each row: pitch in Hz, side level in dB before mixing.
    width = [(30, -38), (70, -46), (130, -84), (300, -29), (600, -36), (1300, -12.5), (2800, -13),
             (5000, -7.5), (11000, -7)]
    scatter = white() * fade(.09, .002)
    diffuse = signal.fftconvolve(x, scatter / np.linalg.norm(scatter))[:N]
    # 1j shifts every pitch by a quarter cycle
    side = filtered(.33 * x + .72 * diffuse, lambda hz: 1j * amp(along(width, hz)))
    shadow = filtered(x, lambda hz: (amp(left_db / 2) - 1) / (1 + (800 / (hz + 1)) ** 4))
    return np.array([x + side + shadow, x - side - shadow])


def plunge():
    """The sinking mesh tears the surface into one dense, unbroken rush of tiny bursts."""
    # The tone of the rush. Each row: pitch in Hz, level in dB.
    rush_tone = [(200, -25), (400, -2), (700, 0), (1100, -2), (1800, 1), (2600, -2), (4000, -6),
                 (7000, -13), (10000, -21), (15000, -30)]
    start_s, sag_db_per_s = .272, 26  # the rush weakens steadily after its start
    sag = amp(-sag_db_per_s * np.maximum(CLOCK - start_s, 0))
    push = together([sag * swell(start_s, hold=.16, rise=.035, fall=.075)])
    return amp(-30.5) * push * colour(grains(20000, 7), rush_tone)


def scene():
    """Water and deck both lie a little to the left, with the wide jolt and breeze around them."""
    water = surroundings(splashing() + gulps() + slaps(), wet_db=-19, t60=0.1)
    blows = clacks() + thumps() + knocks() + clicks()
    rubs = squeaks() + scrapes() + dragging()
    deck = surroundings(blows + rubs, wet_db=-33.0, t60=0.23)
    return place(water, left_db=1.7) + place(deck + lake() + bird(), left_db=1.1) + jolt() + breeze()


def record(dry):
    """The microphone dulls the top treble and keeps nothing from its band limit up."""
    # The microphone's tone. Each row: pitch in Hz, level in dB.
    microphone_tone = [(20, 3.5), (6800, -2.5), (8200, -3), (9500, -3.5), (12000, -12), (14500, -17),
                       (15400, -32)]
    top_hz = 15400
    return filtered(dry, lambda hz: amp(along(microphone_tone, hz)) * (hz < top_hz))


dry = scene()
out = record(dry)
unload_audio(out)
```